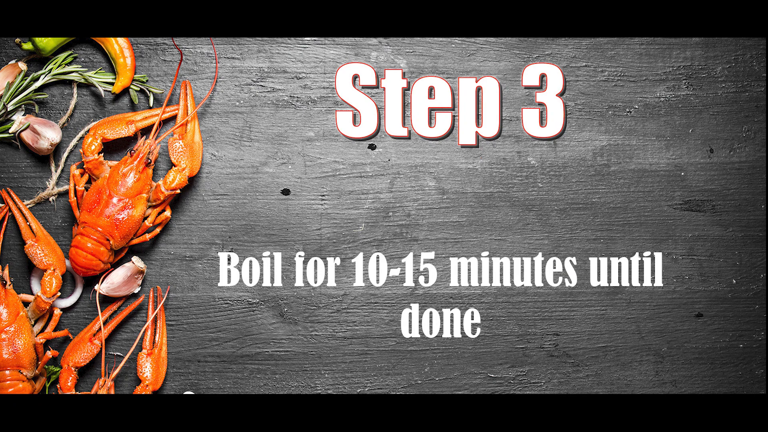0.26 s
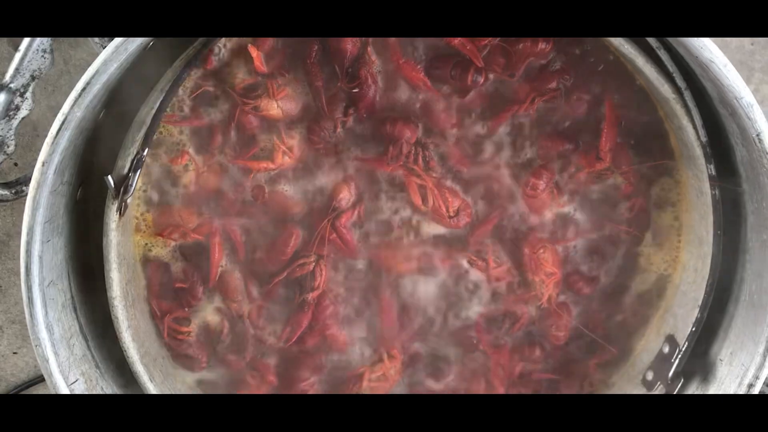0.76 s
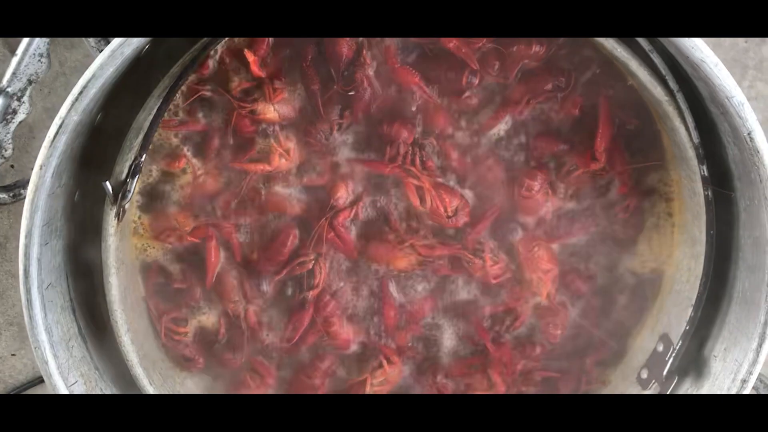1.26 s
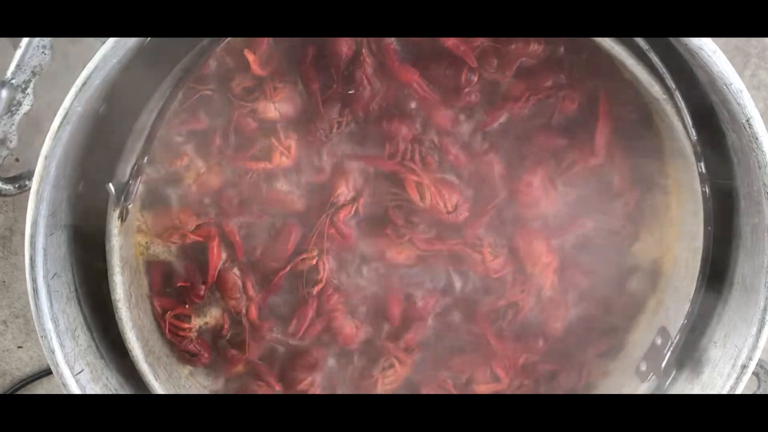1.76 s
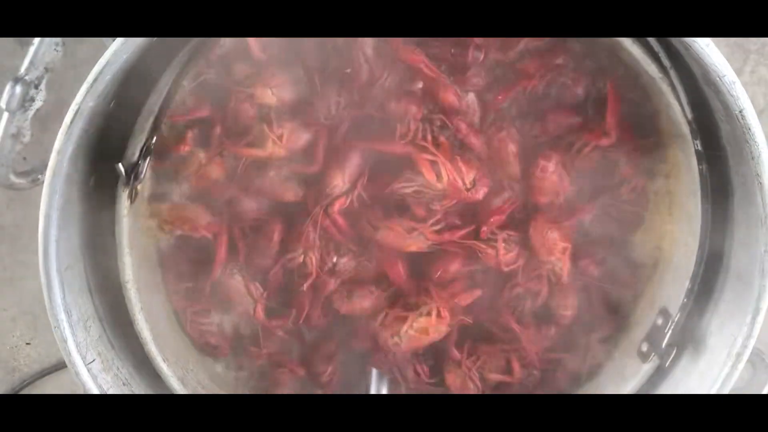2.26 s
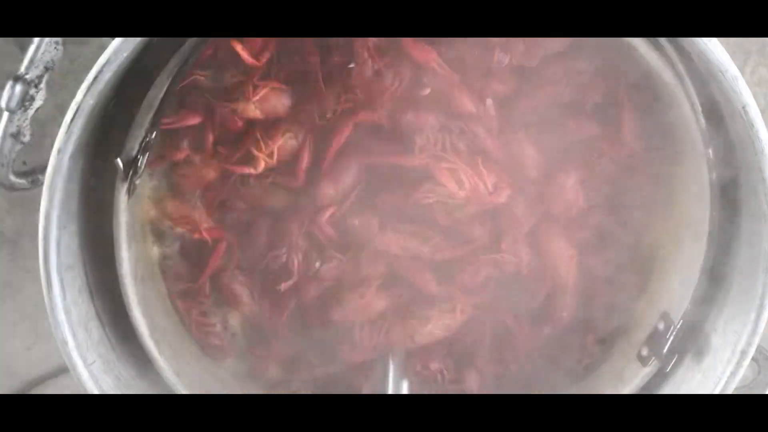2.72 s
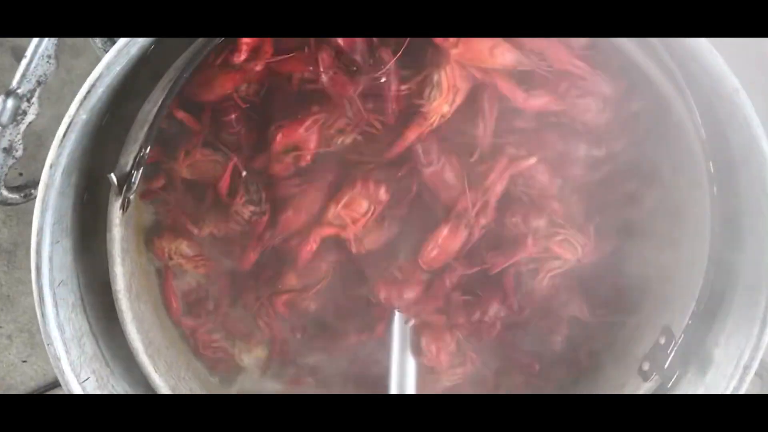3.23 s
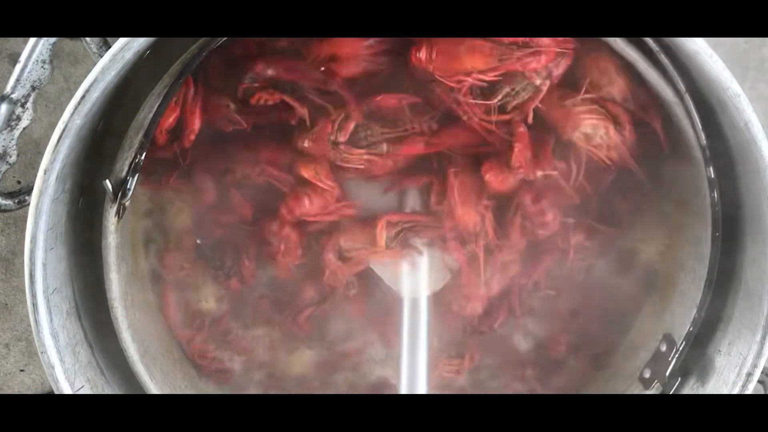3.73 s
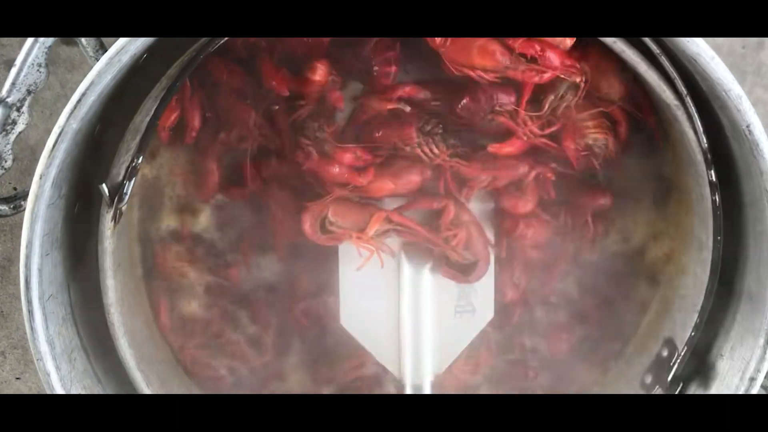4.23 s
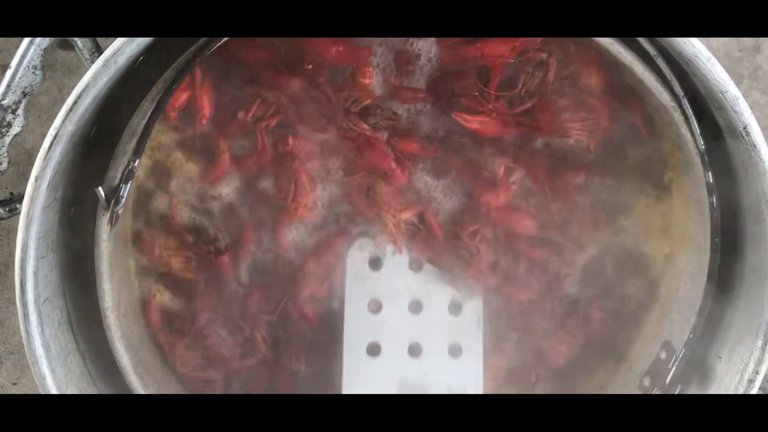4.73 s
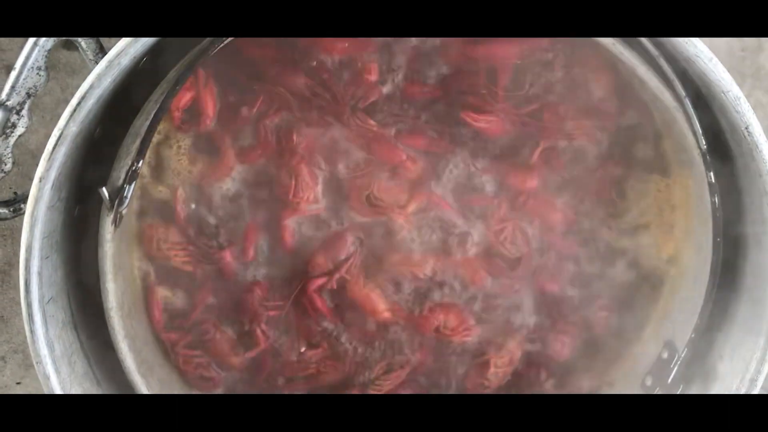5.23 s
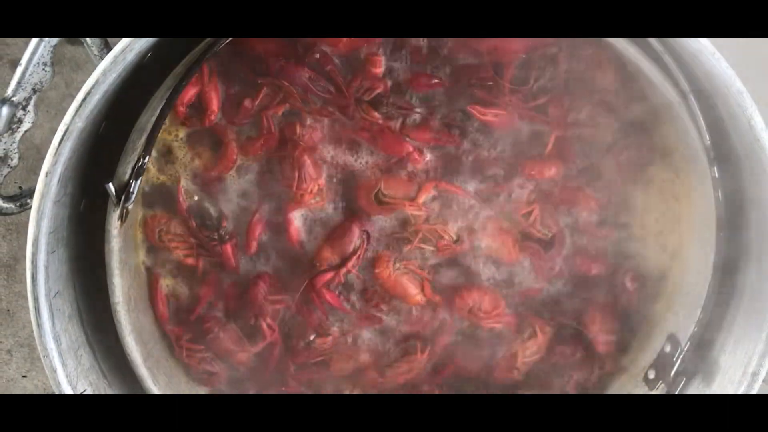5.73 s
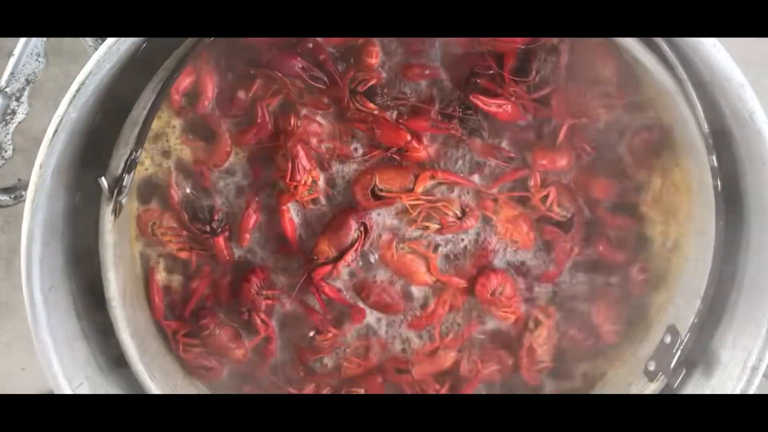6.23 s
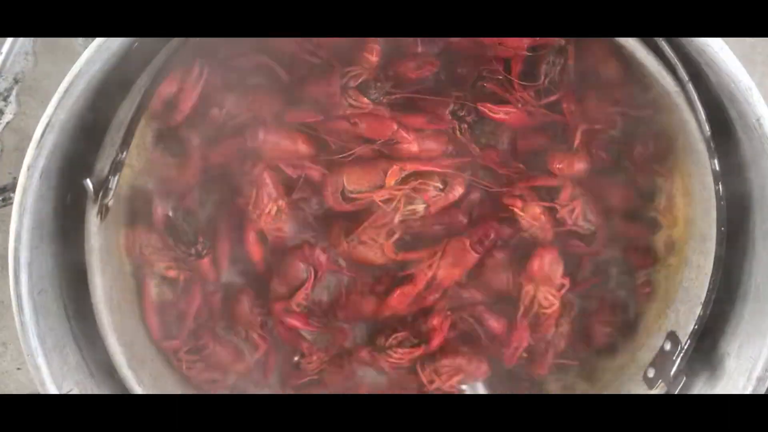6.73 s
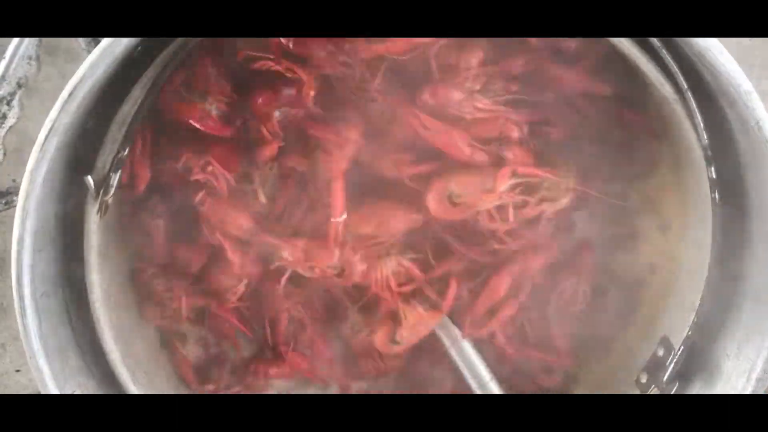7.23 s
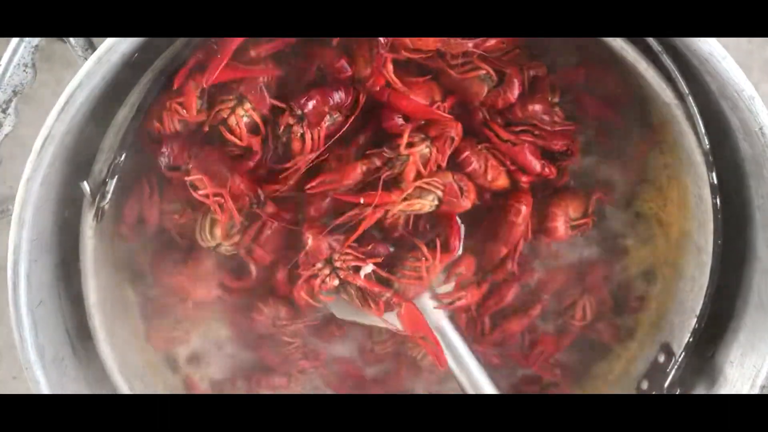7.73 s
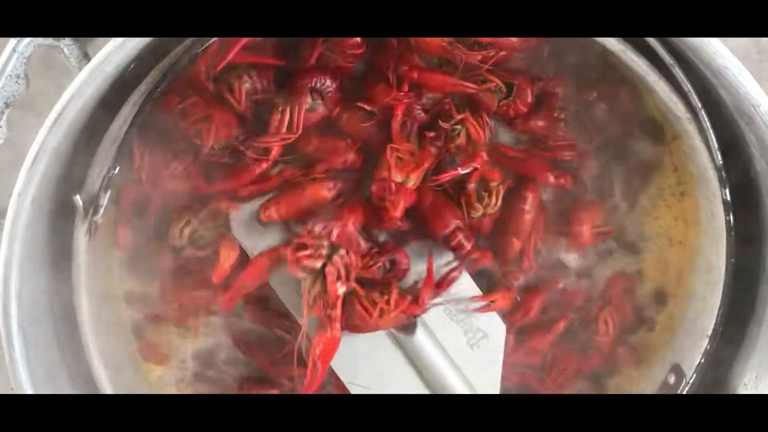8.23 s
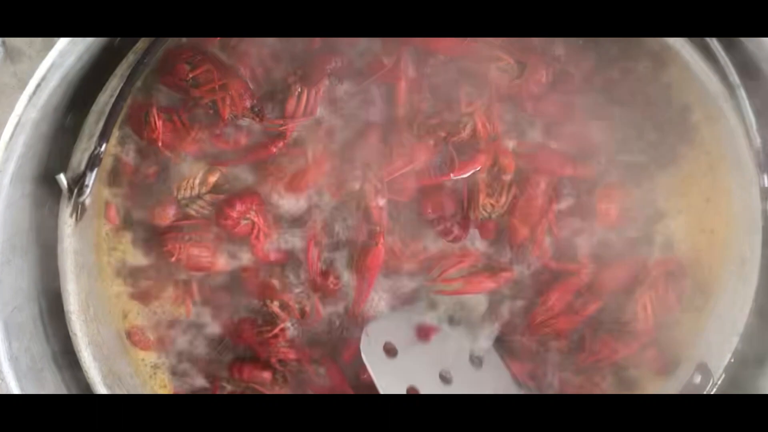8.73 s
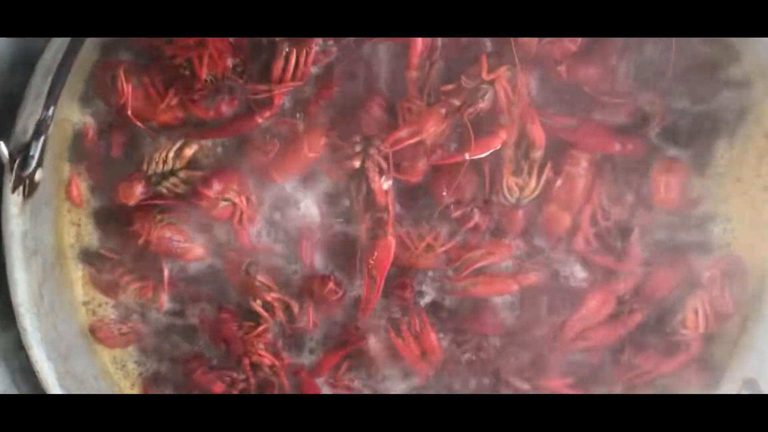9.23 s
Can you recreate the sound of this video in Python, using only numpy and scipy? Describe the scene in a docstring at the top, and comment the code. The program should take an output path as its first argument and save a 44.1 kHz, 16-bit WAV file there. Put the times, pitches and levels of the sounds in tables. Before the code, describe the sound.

Abrupt start of a deep fluttering flame roar with faint gas whistle, bubbling fizz, crackling droplets, and a metal utensil clanking the pot twice.

```python
"""After a short silence a propane flame roars under a big aluminium pot, heard from just above.
The roar is noise shaped by the hollows of the stand and the gap around the pot; the gas jet hisses and whistles.
Foam fizzes as dense ringing grains; grainy bands swell and sink within the roar, and spray spits and crackles.
Metal clanks twice against the pot as cracks, rasps and ringing modes, once with a groan.
Small dry knocks and brief bright clicks, short decaying tones and noise, fall in between."""
import sys
import numpy as np
from scipy import signal
from scipy.fft import rfft, irfft, next_fast_len
from scipy.io import wavfile
from scipy.ndimage import map_coordinates

SR = 44100
rng = np.random.default_rng(int(sys.argv[2]) if len(sys.argv) > 2 else 0)


def wav_out(sig):
    """Save sig, one row per channel (or a flat mono array), as 16-bit PCM at SR to the path in sys.argv[1]."""
    wavfile.write(sys.argv[1], SR, np.round(np.clip(np.atleast_2d(sig).T, -1, 1) * 32767).astype(np.int16))


N = 417627

SIMMER_DB = -58.5  # the foam between surges
# Colour of the bright noise in spits and knocks. Each row: frequency in Hz, relative density in dB.
BRIGHT_COLOUR = [(1500, -28), (3300, 1.5), (4100, -1.5), (5000, -4), (8000, -7), (13000, -8.5),
                 (16000, -15)]


def amp(db):
    """Decibels to gain."""
    return 10 ** (np.asarray(db) / 20)


def unit(x):
    """Scale to rms 1."""
    return x / np.sqrt(np.mean(x ** 2) + 1e-20)


def along(points, hz):
    """(Hz, value) points read on a log axis."""
    f, v = np.transpose(points)
    return np.interp(np.log(hz + 1), np.log(f + 1), v)


def curves(rows):
    """One value per sample for each column after the time."""
    s, *cols = np.transpose(rows)
    return [np.interp(np.arange(N) / SR, s, c) for c in cols]


def wobble(rate_hz):
    """A smooth random curve through rate_hz knots a second."""
    knots = rng.standard_normal(int(N * rate_hz / SR) + 4)
    return map_coordinates(knots, [np.arange(N) * rate_hz / SR])


def filtered(x, response):
    """x times a response of frequency, padded against wrap-around."""
    m = next_fast_len(len(x) + 8192)
    return irfft(rfft(x, m) * response(np.fft.rfftfreq(m, 1 / SR)), m)[:len(x)]


def noise(response, size=N):
    """Coloured noise of rms 1."""
    return unit(filtered(rng.standard_normal(size), response))


def bell(f, hz, width_hz):
    """The power curve of one resonance, top 1."""
    return 1 / (1 + (2 * (f - hz) / width_hz) ** 2)


def fade(t, t60):
    """Exponential decay by 60 dB in t60."""
    return np.exp(-np.log(1000) * t / t60)


def add(track, s, sound):
    """Mix a sound into the track at s seconds."""
    part = track[round(s * SR):][:len(sound)]
    part += sound[:len(part)]


def grains(count, pitch_hz, spread, cycles, size_db):
    """Tiny grains of scattered pitch and size, each ringing for some cycles; rms 1."""
    when, tone = rng.random(count), rng.standard_normal(count)
    size = amp(size_db * np.minimum(rng.exponential(size=count), 4))
    t = np.arange(256) / SR
    turns = np.minimum(pitch_hz * np.exp(spread * tone), SR / 2)[:, None] * t
    rings = size[:, None] * np.sin(2 * np.pi * turns) * fade(turns, cycles)
    places = (when * N).astype(int)[:, None] + np.arange(len(t))
    return unit(np.bincount(places.ravel(), rings.ravel(), N)[:N])


def reflected(x, scatter_db, t60, low_hz=900):
    """The slab, the stand and the pot wall scatter the upper range into a brief cluster of echoes."""
    t = np.arange(SR // 16) / SR
    echoes = noise(lambda f: f ** 2 / (f ** 2 + low_hz ** 2), size=len(t)) * fade(t, t60)
    scattered = signal.fftconvolve(x, echoes / np.linalg.norm(echoes))[:N]
    return x + amp(scatter_db) * scattered


def blowing():
    """How hard the burner blows, in dB around its median."""
    # Each row: time in seconds, level in dB.
    burner_points = [(0.9, -37), (1.47, -39.5), (4.11, -38.5), (4.52, -39), (4.97, -39), (5.56, -37.5),
                     (5.85, -38.5), (6.45, -37), (7.21, -37), (7.52, -40), (8.88, -41), (9.45, -39)]
    level, = curves(burner_points)
    return level - np.median(level)


def hollow_note(levels, pitch_hz, width_hz):
    """A narrow band of the roar swells and sinks."""
    return amp(curves(levels)[0]) * noise(lambda f: bell(f, pitch_hz, width_hz))


def flame(rumble_db=-25.5, roar_gain_db=-3.5, upper_db=-35.0, rumble_growth=0.17, upper_growth=0.37,
          split_hz=450, upper_hz=830, flutter_db=1.0):
    """Turbulent burning excites the hollows around the pot; all flutters, the main hollow swells and sinks."""
    # Turbulence. Each row: frequency in Hz, relative density in dB.
    turbulence = [(22, -45), (36, -13), (48, -3.5), (90, 0.5), (235, -0.5), (330, -7), (400, -12),
                  (470, -11), (520, -8), (700, -4.5), (850, -16.5), (1350, -17.5), (1560, -23.5),
                  (1780, -24), (3200, -30)]
    # Air resonances of the stand and the pot. Each row: frequency in Hz, width in Hz, lift in dB.
    hollows = [(79, 17, 2.5), (106, 15, 1), (116.5, 7.3, -2.5), (131.5, 6, -7.5), (150.9, 16.6, 7),
               (181.3, 2.5, -4), (203.7, 10.7, 9.5), (214.3, 6.2, -7.5), (241, 25, 4.5), (267.4, 28, -4.5),
               (308.2, 20, 5.5), (475, 18, -9), (608, 107, 6.5), (891.5, 38, -5), (913, 35, 8),
               (1325, 68, 5)]
    # Main hollow, the band between split_hz and upper_hz. Each row: time in seconds, level in dB before gain.
    roar_points = [(1.1, -25.5), (2.3, -26), (3.2, -25.5), (4.1, -26), (4.5, -27.1), (4.95, -25.5),
                   (5.35, -27), (6.45, -29), (6.85, -26), (7.4, -25.9), (7.7, -28), (8.3, -28.7),
                   (9.3, -27)]
    strength_db, roar_level = blowing(), curves(roar_points)[0]

    def body(f):
        lift = sum(db * bell(f, hz, w) for hz, w, db in hollows)
        return amp(along(turbulence, f) + lift) / (1 + (f / 5000) ** 4)

    def below(f, edge_hz):
        return 1 / (1 + (f / edge_hz) ** 12)

    def middle(f):
        return body(f) * np.sqrt((1 - below(f, split_hz)) * below(f, upper_hz))

    rumble_noise = noise(lambda f: body(f) * np.sqrt(below(f, split_hz)))
    rumble = amp(rumble_db + rumble_growth * strength_db) * rumble_noise
    roar = amp(roar_gain_db + roar_level) * noise(middle)
    upper_noise = noise(lambda f: body(f) * np.sqrt(1 - below(f, upper_hz)))
    upper = amp(upper_db + upper_growth * strength_db) * upper_noise
    return (rumble + roar + upper) * amp(flutter_db * wobble(30))


def gas(whistle_gain_db=-2.0, hump_db=-44.5, hump_growth=2.35, jet_db=-46.5, waver_db=0.3, flicker_db=2.0):
    """The jet hisses at the nozzle and blows the tube's modes; the lower ones follow the burner's strength."""
    # Upper and broad lower tube resonances. Each row: frequency in Hz, width in Hz, relative level in dB.
    tube, tube_low = [(2600, 87, 1), (2715, 97, 5.5), (2920, 610, -23.5)], [(2152, 200, -1), (2334, 170, -2.5), (2480, 130, -3)]
    # Each row: time in seconds, level in dB before gain.
    whistle_points = [(1.15, -43), (1.9, -41.5), (2.3, -39), (2.9, -43), (3.5, -40), (3.95, -37),
                      (4.45, -43), (4.85, -37), (5.55, -39.5), (5.9, -41.5), (6.45, -38), (7.0, -41.5),
                      (7.3, -38), (7.8, -44.5), (8.15, -40), (8.45, -44), (9.05, -44.5), (9.3, -39.5)]
    # Each row: frequency in Hz, relative density in dB.
    jet_colour = [(1760, -18), (3000, 0.5), (3640, -20), (4930, -10), (5280, -2.5), (5700, -12),
                  (7670, -10), (9300, -8.5), (10500, -18.5), (12900, -7), (15100, -14), (15600, -6)]
    strength_db = blowing()

    def blown(modes):
        return noise(lambda f: np.sqrt(sum((amp(db) * bell(f, hz, w)) ** 2 for hz, w, db in modes)))

    whistle_level = whistle_gain_db + curves(whistle_points)[0] + waver_db * wobble(8)
    hump_level = hump_db + hump_growth * strength_db + waver_db * wobble(8.8)
    jet = amp(jet_db + flicker_db * wobble(15)) * noise(lambda f: amp(along(jet_colour, f)))
    return amp(whistle_level) * blown(tube) + amp(hump_level) * blown(tube_low) + jet


def grainy_bands(gain_db=-1, clump_db=2.0):
    """Grainy bands around 1.3 to 2.5 kHz that swell and sink within the roar."""
    # Each row: start in seconds, length in seconds, level in dB before gain, pitch in Hz, relative pitch spread.
    bands = [(3.1, 0.47, -41, 2500, .22), (3.4, 1.24, -40, 1330, 0.1), (5.05, 0.45, -39.5, 1290, 0.066),
             (5.7, 1.8, -43, 1660, .22), (6.0, 1.2, -41.5, 2450, .19), (8.5, 1, -47, 1250, .08)]
    out, t = np.zeros(N), np.arange(N) / SR
    for s, length_s, db, pitch_hz, spread in bands:
        swell = np.sin(np.pi * np.clip((t - s) / length_s, 0, 1))
        band = grains(count=4000, pitch_hz=pitch_hz, spread=spread, cycles=11, size_db=1.5)
        out += amp(db + gain_db) * swell * band
    return out * amp(clump_db * wobble(18))


def foaming():
    """Foam level in dB: each surge swells to its crest and sinks more slowly, over a steady simmer."""
    # Each row: start in seconds, crest level in dB, time to the crest in seconds.
    surges = [(0.66, -44.5, 0.027), (1.08, -43, 0.14), (1.45, -39.5, 0.075), (3.1, -48, 0.1),
              (3.2, -59, .7), (5.38, -40.5, 0.16), (5.4, -52, 1.1), (8.1, -46, .15)]
    t, power = np.arange(N) / SR, amp(SIMMER_DB) ** 2
    for s, db, crest_s in surges:
        age = np.maximum(t - s, 0) / crest_s
        swell = (age * np.exp(1 - age)) ** 2
        power = power + (amp(db) * swell) ** 2
    return 10 * np.log10(power)


def fizz(foam_gain_db=-3.0, fine_db=-11, clump_db=3.0, sizzle_db=-57, sizzle_rise_db=4, sizzle_knee_db=5,
         sizzle_clump_db=2, surge_db=1.0):
    """Small bubbles burst in clumps; as foam climbs the hot wall a finer sizzle rises, up to a ceiling."""
    foam = grains(count=18000, pitch_hz=4730, spread=0.194, cycles=34, size_db=3.0)
    sizzle = grains(count=18000, pitch_hz=11750, spread=0.226, cycles=110, size_db=0.5)
    foam_level = foaming()
    wetted = np.tanh((foam_level - SIMMER_DB) / sizzle_knee_db)
    sizzle_level = sizzle_db + sizzle_rise_db * wetted
    sizzle_level = sizzle_level + sizzle_clump_db * wobble(30) + surge_db * wobble(5.8)
    foam_gain = amp(foam_level + foam_gain_db + clump_db * wobble(25))
    return (foam + amp(fine_db) * sizzle) * foam_gain + sizzle * amp(sizzle_level)


def spits(gain_db=0, t60=0.069, lift_db=5, lift_width=0.18, faint_db=-44, faint_scatter_db=4, faint_hz=6000):
    """Droplets land on hot metal and flash into short hisses; faint ones fall at random."""
    # Each row: start in seconds, level in dB, strongest pitch in Hz.
    spit_rows = [(1.4415, -34, 5500), (1.448, -38, 7000), (1.5496, -32, 7000), (1.556, -33, 11500),
                 (1.571, -36, 11500), (3.566, -39.5, 6500), (4.595, -33.5, 5500), (5.855, -34, 14000),
                 (6.0553, -36.5, 4000), (8.243, -34, 5800), (8.612, -32, 3600), (8.621, -32, 4000),
                 (8.629, -38, 6400)]
    out, t = np.zeros(N), np.arange(SR // 8) / SR
    faint = [(when * N / SR, faint_db + faint_scatter_db * (2 * size - 1), faint_hz * 2 ** (tone - .5))
             for when, size, tone in rng.random(size=(24, 3))]
    for s, db, hz in [*spit_rows, *faint]:
        colour = lambda f: along(BRIGHT_COLOUR, f) + lift_db * bell(f, hz, lift_width * hz)
        hiss = noise(lambda f: amp(colour(f)), size=len(t))
        add(out, s, amp(db + gain_db) * hiss * fade(t, t60))
    return out


def crackles(rate_hz=2000, t60=0.006, scatter_db=2.5):
    """A raft of small bubbles bursts in quick succession, each with its own size and pitch."""
    # Each row: start in seconds, length in seconds, level in dB, pitch in Hz, relative pitch spread.
    rafts = [(1.484, 0.064, -40, 5230, .18), (1.549, .025, -35, 5370, 0.13),
             (1.552, .028, -38, 4300, 0.062), (1.58, 0.034, -47, 4250, .06), (5.849, .04, -39, 4100, .035)]
    out, t = np.zeros(N), np.arange(SR // 100) / SR
    for s, length_s, db, pitch_hz, spread in rafts:
        raft = np.zeros(round(length_s * SR) + len(t))
        bursts = max(round(rate_hz * length_s), 1)
        for k, (late, size, tone) in enumerate(rng.standard_normal((128, 3))[:bursts]):
            hz = pitch_hz * np.exp(spread * tone)
            ping = np.sin(2 * np.pi * hz * t) * fade(t, t60)
            burst_s = length_s * np.clip((k + late / 2) / bursts, 0, 1)
            add(raft, burst_s, amp(scatter_db * size) * ping)
        add(out, s, amp(db) * unit(raft))
    return out


def knocks(gain_db=3.0, attack_s=0.00025, tail_db=-29, tail_t60=0.028, band_db=-2, band_t60=0.011,
           band_width=0.79, band_ratio=1.19, click_db=-7, click_t60=0.005):
    """Small dry knocks: a click, a short ring near 4.2 kHz, a lower thump, an overtone and bright noise."""
    # Each row: start in seconds, level in dB before gain, ring pitch in Hz, thump pitch in Hz,
    # thump level and overtone level in dB relative to the ring.
    knock_rows = [(1.4217, -11, 4500, 1600, 1, -1), (1.441, -28, 4700, 2400, -6, -1),
                  (1.5767, -14, 4300, 1400, -8, -12), (1.6239, -28, 4200, 1650, -6, -10),
                  (1.901, -20.5, 4300, 1500, 1, -10), (1.9246, -32, 4000, 1650, -6, -14),
                  (4.1667, -19.5, 3430, 2600, -2.5, -16), (5.7537, -10, 4250, 1620, 3, -5),
                  (5.7646, -25, 6400, 2000, 0, -8), (5.8408, -19.5, 4130, 1400, 4.5, -20),
                  (5.8497, -22, 4100, 1650, -8, -22), (5.8543, -15, 4020, 1600, -3, -20),
                  (5.8638, -18, 3980, 2100, -7, -20), (5.869, -11.5, 4080, 1600, -9.5, -24),
                  (5.8977, -28, 4150, 1650, -6, -16), (7.527, -25, 3600, 1650, -8, -16)]
    # above usual_db the ring's t60 halves every halving_db
    usual_db, usual_t60, halving_db = -25, 0.0081, 25
    thump_t60, overtone_hz, overtone_t60 = 0.003, 6720, 0.0047
    out, t = np.zeros(N), np.arange(SR // 16) / SR

    def ping(hz, t60):
        return np.sin(2 * np.pi * hz * t) * fade(t, t60) * (1 - np.exp(-t / attack_s))

    for s, db, hz, thump_hz, thump_db, overtone_db in knock_rows:
        t60 = usual_t60 * .5 ** (max(db - usual_db, 0) / halving_db)
        thump = amp(thump_db) * ping(thump_hz, thump_t60)
        overtone = amp(overtone_db) * ping(overtone_hz, overtone_t60)
        tones = ping(hz, t60) + thump + overtone
        # a broad band of noise just above the thump
        band = lambda f: 1 / (1 + (2 * (f / (band_ratio * thump_hz) - 1) / band_width) ** 6)
        thump_noise = noise(band, size=len(t)) * fade(t, band_t60)
        bright_decay = amp(click_db) * fade(t, click_t60) + amp(tail_db) * fade(t, tail_t60)
        bright = noise(lambda f: amp(along(BRIGHT_COLOUR, f)), size=len(t)) * bright_decay
        add(out, s, amp(db + gain_db) * (tones + amp(band_db + thump_db) * thump_noise + bright))
    return out


def bright_clicks(ring_db=-12, longest_t60=.07, crack_db=-3.0, crack_t60=0.042, scatter_db=2, detune=0.03):
    """Brief bright clicks: a crack and a few high modes, varied each time."""
    # Each row: start in seconds, level in dB.
    click_rows = [(0.711, -33.5), (1.944, -39), (1.958, -40), (3.775, -37.5), (8.643, -31.5), (8.665, -34),
                  (8.697, -35), (9.097, -35), (9.294, -28), (9.322, -32), (9.329, -42), (9.344, -25.5)]
    # Each row: frequency in Hz, relative level in dB, t60 in seconds before the cap.
    click_modes = [(4380, -8, 0.078), (5470, -22, .05), (6480, -2.5, 0.063), (7240, -11, .05),
                   (8300, -8, 0.07), (8900, -2, 0.072), (9580, -4, .05), (11650, -2.5, 0.059),
                   (13200, -6, 0.07), (14200, -4, 0.07)]
    # Each row: frequency in Hz, relative density in dB.
    crack_colour = [(1500, -25), (3500, 0.5), (13000, 1), (16000, -2)]
    out, t = np.zeros(N), np.arange(SR // 8) / SR
    hz, level, t60 = np.transpose(click_modes)[:, :, None]
    for s, db in click_rows:
        strength = amp(level - level.max() + scatter_db * rng.standard_normal(hz.shape))
        varied_hz = hz * (1 + detune * rng.uniform(-1, 1, hz.shape))
        tones = np.sin(2 * np.pi * (varied_hz * t + rng.random(hz.shape)))
        ring = np.sum(strength * tones * fade(t, np.minimum(t60, longest_t60)), axis=0)
        crack = noise(lambda f: amp(along(crack_colour, f)), size=len(t)) * fade(t, crack_t60)
        add(out, s, amp(db) * (amp(ring_db) * ring + amp(crack_db) * crack))
    return out


def groan(gain_db=0, rough=0.38, grain_rate_hz=400):
    """Metal dragged along the rim sticks and slips: a rough tone that climbs as it is pressed harder."""
    # Each row: time in seconds, pitch in Hz, level in dB.
    groan_points = [(5.398, 857, -28), (5.413, 898, -17), (5.421, 1100, -30), (5.433, 1100, -25),
                    (5.446, 1110, -24.5), (5.458, 1150, -22), (5.47, 1150, -36)]
    hz, db = curves(groan_points)
    t = np.arange(N) / SR
    sliding = (t > groan_points[0][0]) & (t < groan_points[-1][0])
    roughness = 1 + rough * wobble(grain_rate_hz)
    return sliding * amp(db + gain_db) * roughness * np.sin(2 * np.pi * np.cumsum(hz) / SR)


def clanks(ring_db=-23, rasp_db=-1.5, lift_db=5, lift_width=0.21, modal_db=9, mode_width_hz=70, detune=0.0013,
           held_t60=0.27, wash_db=-25, wash_t60=0.23, crack_db=-2, crack_t60=0.0049, note_db=-5.5,
           note_db_per_octave=-7, note_t60=.09, hard_db=-12, dulling=.35, dull_hz=6000):
    """Each contact cracks, rasps with the colour of its spot and rings the pot; soft ones are duller."""
    # Each row: start in seconds, level in dB, strongest pitch in Hz, place along the rim 0-1, rasp t60 in seconds.
    contacts = [(0.9489, -14, 4120, 0.1, 0.03), (0.956, -11, 1540, 0.08, 0.057),
                (0.9628, -14, 1700, 0.16, 0.052), (0.968, -20, 1510, 0.2, .045),
                (0.992, -24, 4100, 0, 0.083), (1.001, -32, 4100, 0.1, .04),
                (5.3984, -14, 3780, 0.85, 0.037), (5.4081, -17.5, 4000, 0.8, 0.03),
                (5.417, -15, 3900, 1, 0.027), (5.4231, -16, 3380, 1, 0.031), (5.431, -20, 2800, 1, .035),
                (5.438, -25, 2650, 0.9, .035), (5.444, -23, 4050, 0.9, .035),
                (5.4476, -19, 2870, 0.95, 0.047), (5.454, -22, 2630, 0.9, 0.041), (5.46, -33, 2700, 1, .04),
                (5.469, -38, 4500, .8, .04)]
    # Pot modes. Each row: frequency in Hz, level in dB struck at place 0, same at place 1, t60 in seconds if free.
    pot_modes = [(1100, 2, -11, .22), (1437, 8, -10, .1), (1680, 8, -16, .1), (2223, -10, 2, .22),
                 (2339, -5, -7, .35), (2583, -12, 10, .26), (2637, -2, -5, .4), (2783, -10, 9, .22),
                 (3003, -5, 6, .22), (3213, -5, 4, .22), (3398, -8, 4, .5), (3641, -1, -9, .48),
                 (3924, -8, 7, .2), (4070, 1, 4, .14), (4260, -2, 3, .14), (4822, -11, 1, .6),
                 (5001, -14, 0, .22), (5345, -2, -10, .19), (5609, -14, 3, .15), (5878, -6, 4, .38),
                 (6371, -2, -20, .15), (6778, -8, -6, .5), (7135, -6, -22, .2), (7412, -4, -5, .28),
                 (7716, -6, -9, .48), (8130, -4, -4, .16), (8410, -10, -11, .52), (8519, -4, -18, .18),
                 (8735, -8, -2, .36), (9689, -7, -18, .16), (10300, -15, -5, .27), (11208, -22, -1, .28),
                 (12865, -5, -6, .2), (13280, -8, -20, .17)]
    # Each row: frequency in Hz, relative density in dB.
    rasp_colour = [(470, -24), (800, -11), (1120, -5.5), (1300, -11), (1490, -8.5), (1890, -11), (2700, -9),
                   (3350, -5), (4080, -4.5), (5000, -14.5), (5770, -6), (8500, -14), (11600, -13),
                   (15600, -23)]
    out, t = np.zeros(N), np.arange(SR // 2) / SR
    hz, near, far, t60 = np.transpose(pot_modes)[:, :, None]
    for s, db, pitch_hz, rim_place, rasp_t60 in contacts:
        place = np.clip(rim_place, 0, 1)
        strength = amp(near + place * (far - near) + 2 * rng.standard_normal(hz.shape))
        # the touching metal detunes the modes a little at every contact
        loaded_hz = hz * (1 + detune * rng.uniform(-1, 1, hz.shape))
        tones = np.sin(2 * np.pi * (loaded_hz * t + rng.random(hz.shape)))
        ring = np.sum(strength * tones * fade(t, t60), axis=0)
        # far along the rim the metal stays pressed on and damps the ring
        ring = ring * fade(place * t, held_t60)
        # the struck spot sings briefly, weaker with every octave up
        note_gain = amp(note_db + note_db_per_octave * np.log2(pitch_hz / 1000))
        note = note_gain * np.sin(2 * np.pi * pitch_hz * t) * fade(t, note_t60)
        soft_db = dulling * min(db - hard_db, 0)

        def rasp_response(f):
            # the rasp sounds through the pot's modes
            modal = np.max(np.minimum(np.sqrt(2 * strength), 1) * bell(f, hz, mode_width_hz), axis=0)
            dull = soft_db * (1 - 1 / (1 + (f / dull_hz) ** 4))
            lift = lift_db * bell(f, pitch_hz, lift_width * pitch_hz)
            return amp(along(rasp_colour, f) + dull + modal_db * modal + lift)

        rasp = noise(rasp_response, size=len(t))
        # a sharp crack leads; countless weak modes linger as a wash
        decay = amp(crack_db + 2 * soft_db) * fade(t, crack_t60)
        decay += amp(rasp_db + soft_db / 2) * fade(t, rasp_t60)
        decay += amp(wash_db) * fade(t, wash_t60)
        add(out, s, amp(db) * (amp(ring_db) * ring + note + rasp * decay))
    return out


def scene():
    """Burner and pot in the open air; echoes follow the burner, and shorter ones the knocks and spits."""
    # Hollow notes, one that comes and goes and a deeper one that dies away. Each row: time in seconds, level in dB.
    note_points, low_note_points = [(5.6, -59), (6.4, -47), (7.2, -38.5), (7.8, -47), (8.5, -49),
                                    (9.1, -40)], [(0.9, -41), (1.8, -37.5), (3.1, -36), (4.4, -40),
                                                  (5.6, -59)]
    notes = hollow_note(note_points, pitch_hz=1139, width_hz=87)
    notes += hollow_note(low_note_points, pitch_hz=306, width_hz=65)
    burner = reflected(flame() + gas() + notes, scatter_db=-14, t60=.1)
    details = reflected(knocks() + crackles() + spits(), scatter_db=-10, t60=.02)
    return (burner + details + fizz() + grainy_bands() + clanks() + groan() + bright_clicks())[None]


def record(dry, start_s=0.671, ramp_s=.002, ceiling=.78, top_hz=15750):
    """The microphone opens abruptly, rounds off the tallest peaks and keeps nothing above its band limit."""
    heard = dry[0] * np.clip((np.arange(N) / SR - start_s) / ramp_s, 0, 1)
    rounded = heard / (1 + (heard / ceiling) ** 6) ** (1 / 6)
    return filtered(rounded, lambda f: f < top_hz)[None]


dry = scene()
out = record(dry)
wav_out(out)
```